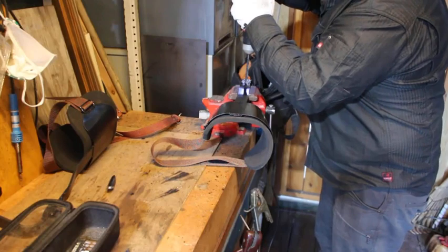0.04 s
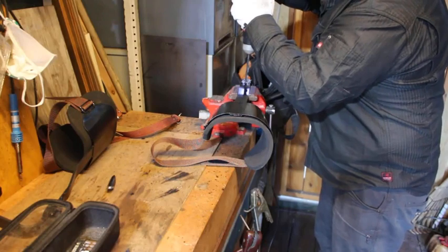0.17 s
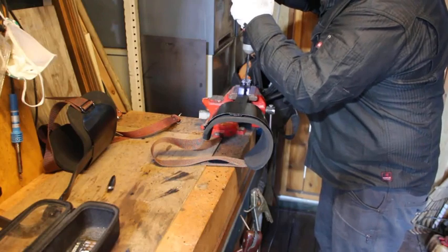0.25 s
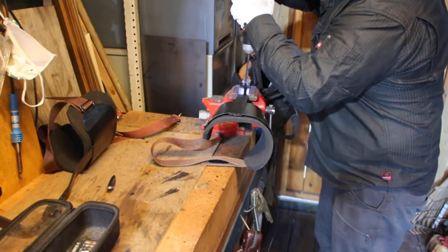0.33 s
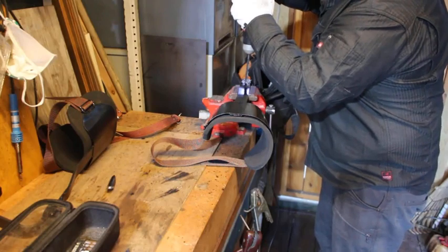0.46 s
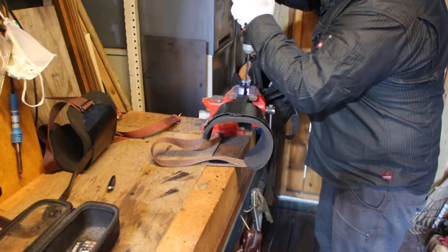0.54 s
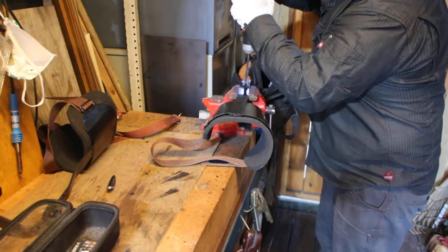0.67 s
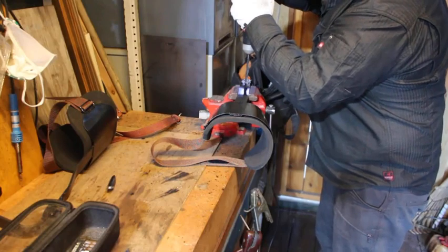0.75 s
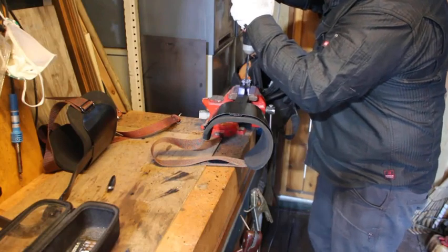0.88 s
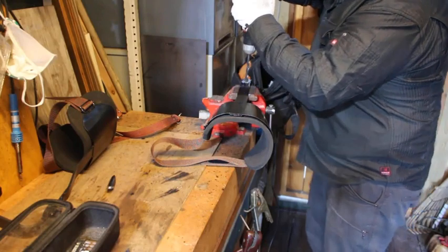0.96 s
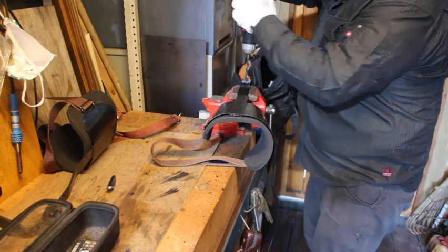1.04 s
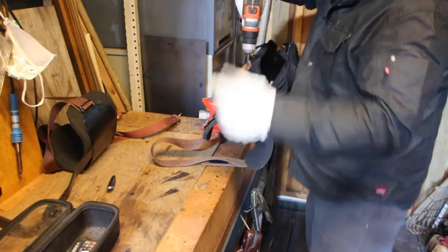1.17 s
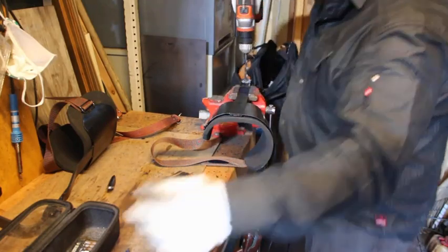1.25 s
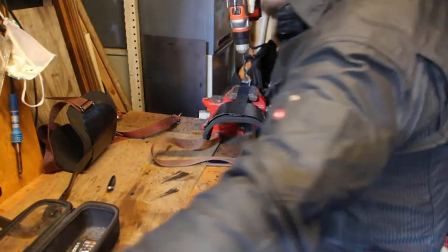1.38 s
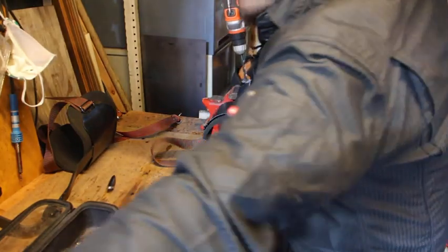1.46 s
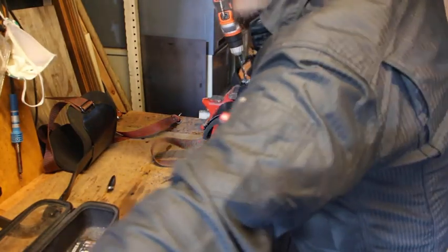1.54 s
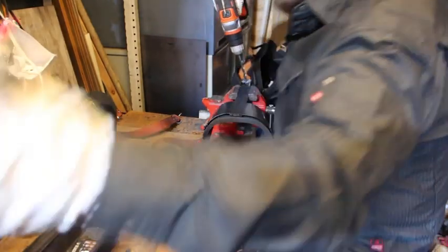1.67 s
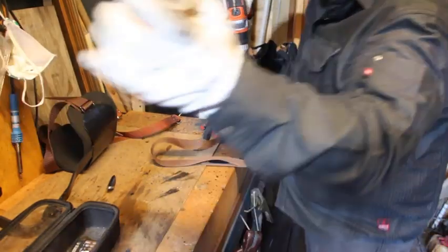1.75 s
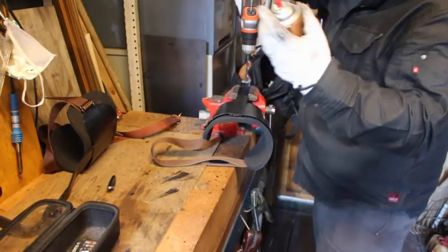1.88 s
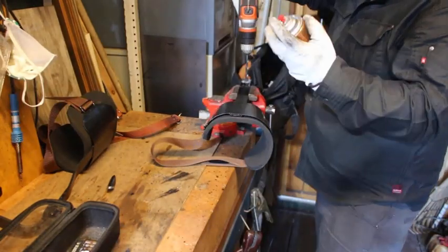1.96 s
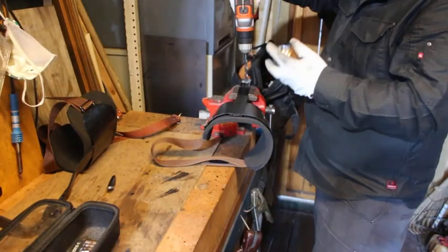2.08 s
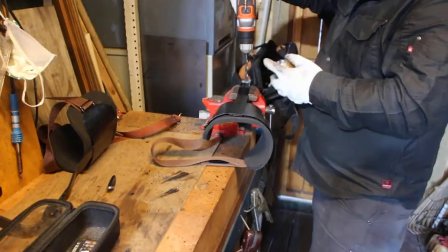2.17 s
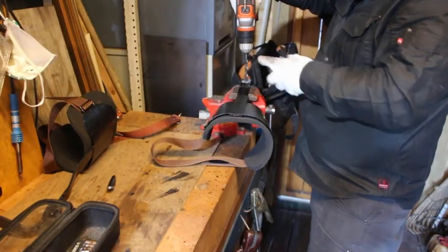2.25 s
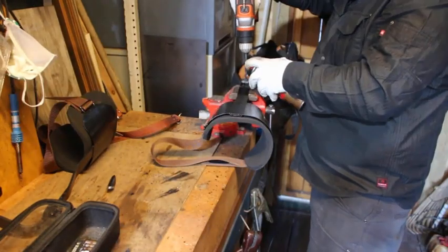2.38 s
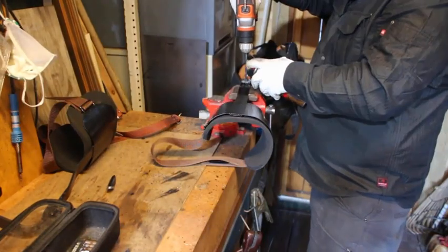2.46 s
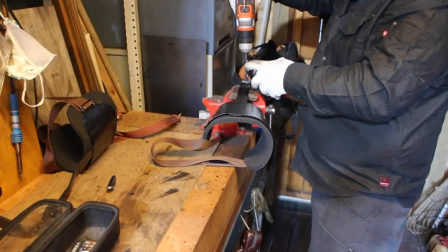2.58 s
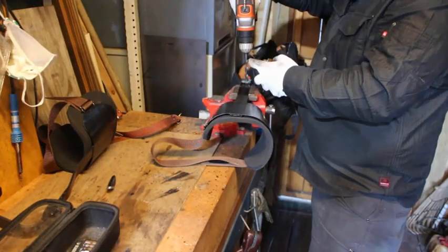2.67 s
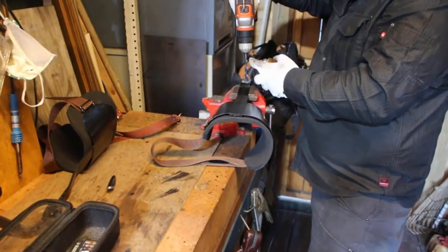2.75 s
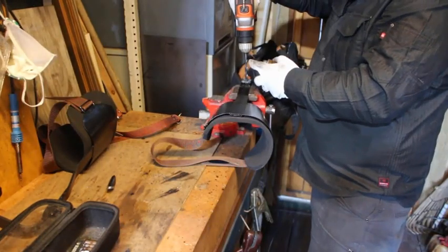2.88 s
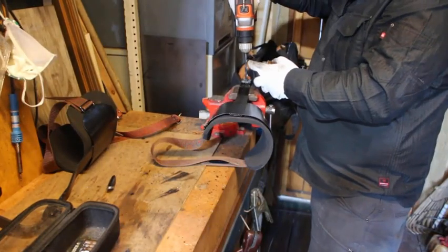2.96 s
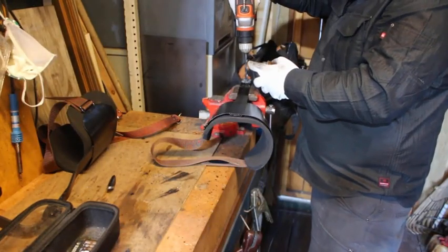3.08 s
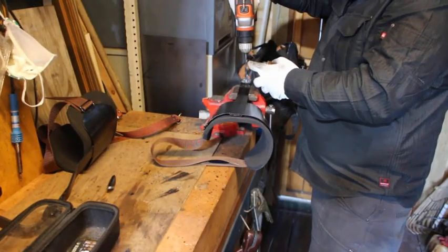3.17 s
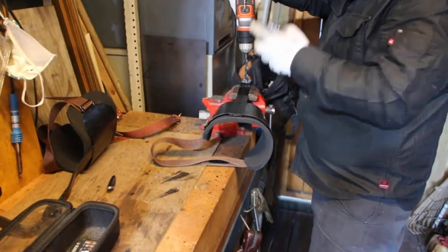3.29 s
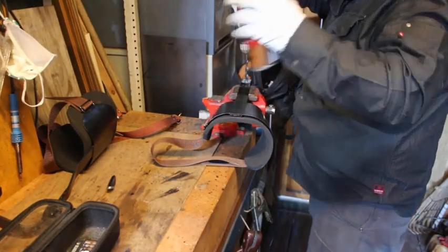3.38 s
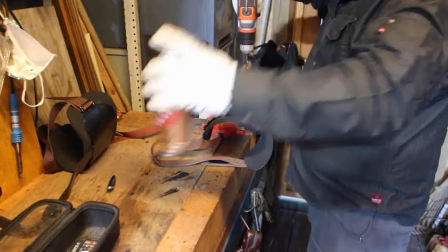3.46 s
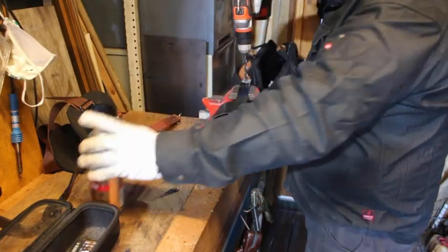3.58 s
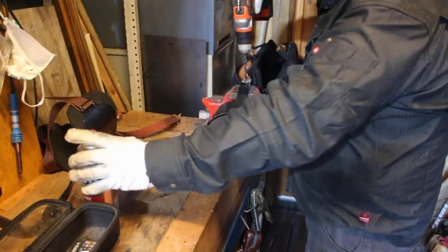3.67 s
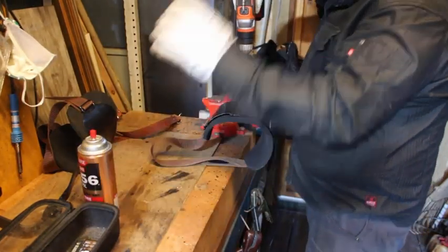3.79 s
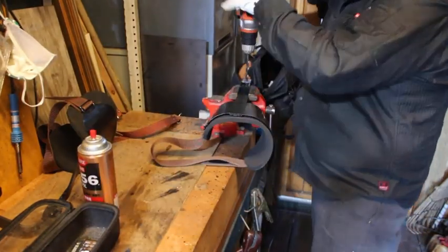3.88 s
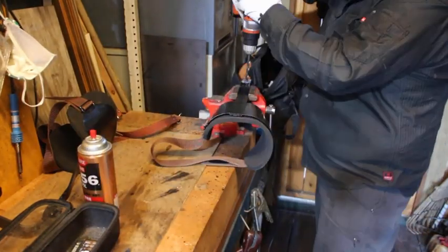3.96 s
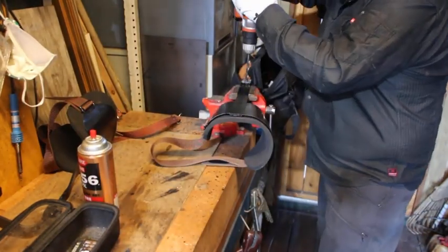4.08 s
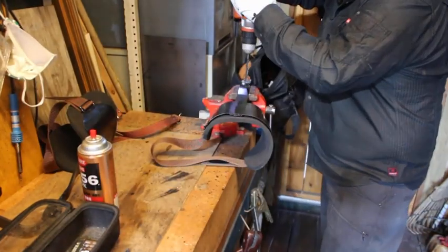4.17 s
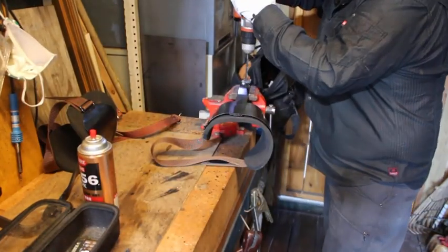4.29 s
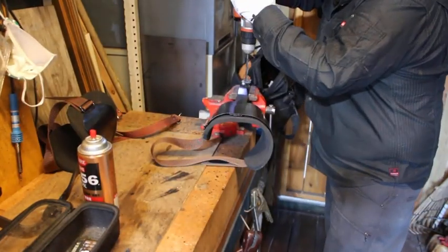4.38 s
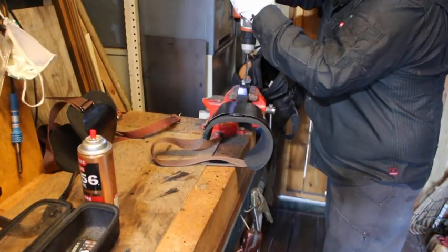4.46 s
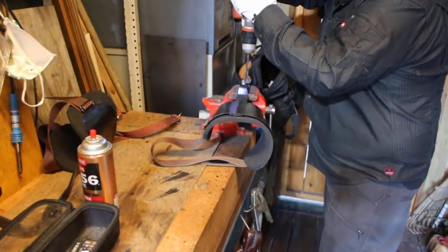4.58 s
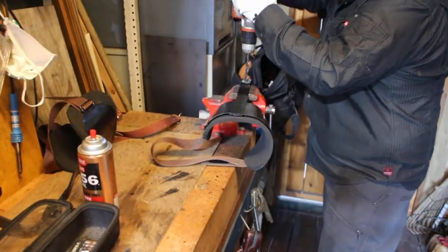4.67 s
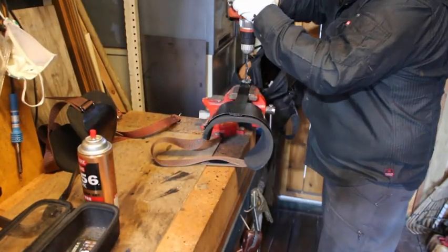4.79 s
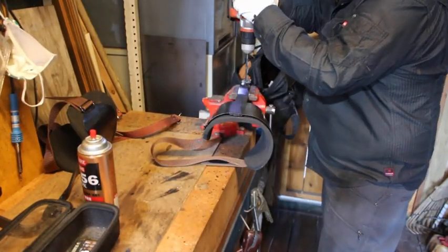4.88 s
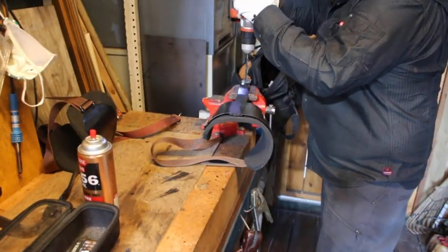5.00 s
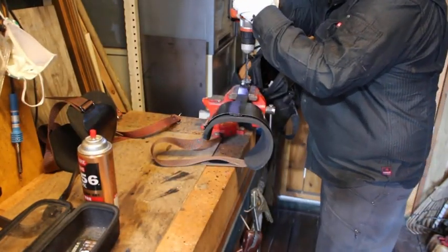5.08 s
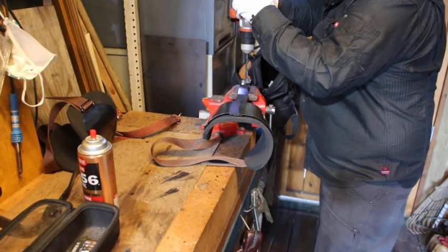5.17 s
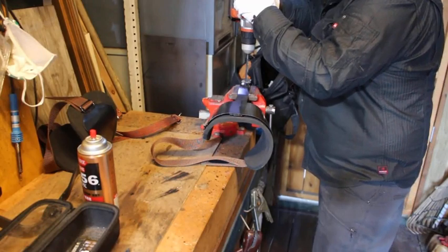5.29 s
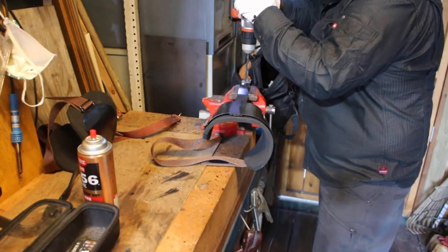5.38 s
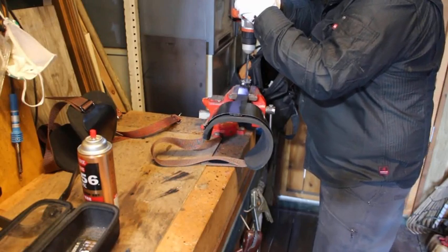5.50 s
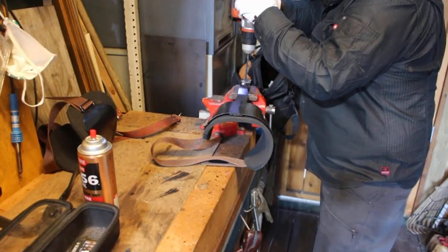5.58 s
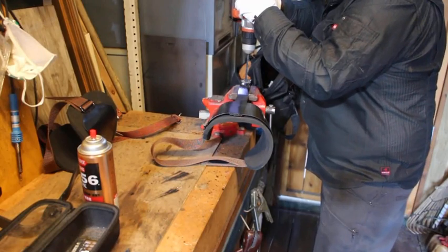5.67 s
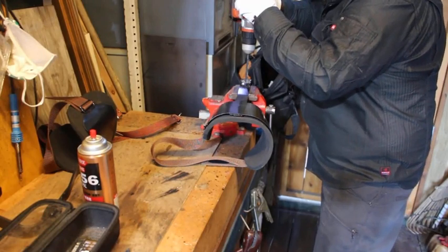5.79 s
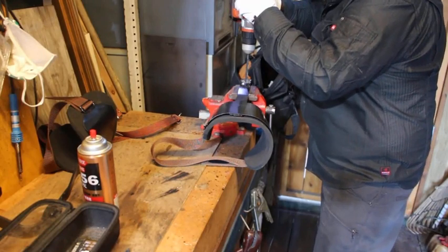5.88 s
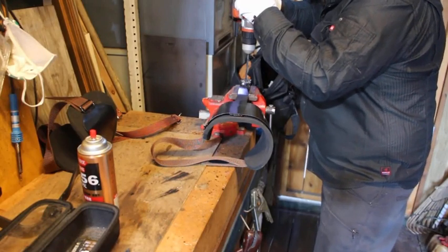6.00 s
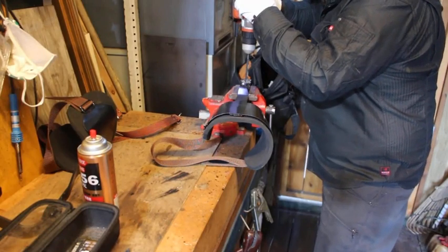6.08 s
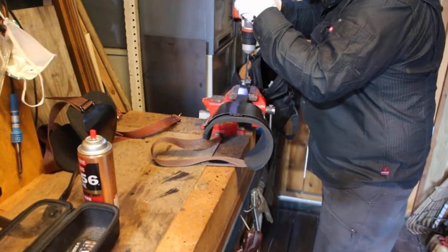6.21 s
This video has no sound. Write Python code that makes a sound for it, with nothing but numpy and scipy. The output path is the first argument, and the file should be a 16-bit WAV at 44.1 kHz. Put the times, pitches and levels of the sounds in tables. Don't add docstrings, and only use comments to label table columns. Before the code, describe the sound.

Close stereo microphones in a small, cluttered wooden workshop with short, dry reflections. From the start a cordless drill bores metal: loud, bright grinding noise with a dense high whine of motor and gears, pulsing about twelve times a second, with small surges as the bit catches. At 0.94 s it brakes abruptly into faint airy room noise. Between 1.0 and 1.35 s a jacket swishes and loose tools knock lightly on the bench; a stronger cloth swish comes at 1.9 s with faint knocks just before. Four short fine hisses of sprayed oil follow at 2.5, 2.75, 3.0 and 3.1 s, growing stronger. At 3.64 s the thin can clacks onto wood, then sleeve rustles until 4.0 s. The drill spins up at 4.17 s for half a second and stops with a tiny squeal at 4.66 s. At 4.85 s it restarts with a chirp and bores on, lower and loaded, to the end.

```python
import sys
import numpy as np
from scipy import signal
from scipy.fft import rfft, irfft
from scipy.io import wavfile

SR = 44100
rng = np.random.default_rng(int(sys.argv[2]) if len(sys.argv) > 2 else 0)


def master(y):
    cut = np.clip(np.atleast_2d(y).T, -1, 1)
    pcm = np.round(cut * 32767)
    wavfile.write(sys.argv[1], SR, pcm.astype(np.int16))


def convert_level_to_amplitude(level_db):
    exponent = np.asarray(level_db, float) / 20
    return 10 ** exponent


N = 275184

# pitch_hz, side_over_mid_db
NEAR_SIDE = [(60, 5), (110, 11), (200, 31), (380, -30), (700, -40), (1290, -30), (2380, -13.5), (4400, -8),
             (8120, -4.5), (15000, -1)]


def rms_one(x):
    return x / np.sqrt(np.mean(x ** 2) + 1e-20)


def in_time(rows):
    s, *columns = np.transpose(rows)
    return [np.interp(np.arange(N) / SR, s, c) for c in columns]


def at_hz(points, hz):
    points_hz, values = np.transpose(points)
    return np.interp(np.log(hz), np.log(points_hz), values)


def drift(rate_hz):
    r = np.exp(-80 * np.pi * rate_hz / SR)
    coarse = rng.standard_normal(N // 40 + 2002)
    slow = signal.lfilter([1], [1, -2 * r, r * r], coarse)[2000:]
    return np.interp(np.arange(N) / 40, np.arange(len(slow)), rms_one(slow))


def ring(push, hz, t60):
    r, w = convert_level_to_amplitude(-60 / (t60 * SR)), 2 * np.pi * hz / SR
    return signal.lfilter([0, np.sin(w)], [1, -2 * r * np.cos(w), r * r], push + 1e-18)


def coloured(mid_side, spectrum, side, peaks=()):
    hz = np.maximum(np.arange(N // 2 + 1) * SR / N, 1)
    gain = convert_level_to_amplitude(at_hz(spectrum, hz))
    for peak_hz, width_hz, db in peaks:
        gain = gain * (1 + (convert_level_to_amplitude(db) - 1) / (1 + (2 * (hz - peak_hz) / width_hz) ** 2))
    widths = [np.ones_like(hz), convert_level_to_amplitude(at_hz(side, hz))]
    mid, rest = irfft(rfft(mid_side) * gain * widths, N)
    return np.array([mid + rest, mid - rest]) / np.std(mid)


def patchy(x, depth_db, rate):
    centres, shared = 200 * 2 ** np.arange(0, 6.6, .5), drift(rate)
    spectrum, hz, out = rfft(x), np.arange(N // 2 + 1) * SR / N, 0
    inside_hz = np.clip(hz, centres[0], centres[-1])
    for centre in centres:
        slope = np.clip(1 - 2 * np.abs(np.log2(inside_hz / centre)), 0, 1)
        flicker_db = depth_db * (0.51 * shared + drift(rate))
        out = out + irfft(spectrum * slope, N) * convert_level_to_amplitude(flicker_db)
    return out


def puffs(rows, spectrum, grain_db, fall_s, fall_per_rise):
    out = np.zeros((2, N))
    grains = rng.standard_normal((2, N)) * convert_level_to_amplitude(grain_db * rng.standard_normal(N))
    noise = coloured(grains, spectrum, NEAR_SIDE)
    for s, rise, hold, db, tilt_db in rows:
        i = round(s * SR)
        n = round((rise + hold + 2 * (fall_s + fall_per_rise * rise)) * SR)
        corners_s = [0, rise / 4, rise, rise + hold, n / SR]
        shape_db = np.interp(np.arange(n) / SR, corners_s, [-38, -8.5, 6.5, 4.5, -37])
        tilt = convert_level_to_amplitude(tilt_db * np.log2(np.arange(1, n // 2 + 2) * SR / n / 4000))
        burst = rms_one(irfft(rfft(noise[:, i:i + n]) * tilt, n))
        out[:, i:i + n] += convert_level_to_amplitude(db + shape_db) * burst
    return out


def struck(hits, modes, crack_db):
    out, t = np.zeros(N), np.arange(9000) / SR
    for s, db, centre_hz, contact_s in hits:
        contact = rng.standard_normal(len(t)) * np.exp(-t / contact_s * 2) * np.minimum(t / 0.00078, 1)
        sound = sum(convert_level_to_amplitude(level_db) * ring(contact, hz, t60) for hz, level_db, t60 in modes)
        sound = rms_one(sound) + convert_level_to_amplitude(crack_db) * rms_one(contact)
        band_hz = [centre_hz / 2.2, centre_hz * 1.7]
        sound = signal.lfilter(*signal.butter(2, band_hz, "band", fs=SR), sound)
        out[round(s * SR):][:len(t)] += convert_level_to_amplitude(db) * sound / np.max(np.abs(sound))
    return out


def shop(x, wet_db):
    n, t60_s = SR // 4, 0.046
    tail = rng.standard_normal((2, n)) * convert_level_to_amplitude(-60 * np.arange(n) / SR / t60_s)
    tail = tail / np.sqrt(np.sum(tail ** 2, axis=1, keepdims=True))
    return x + convert_level_to_amplitude(wet_db) * signal.fftconvolve(np.atleast_2d(x), tail, axes=1)[:, :N]


def air():
    # pitch_hz, level_db per Hz
    air_colour = [(88, -70), (150, -48), (249, -5), (297, -16), (637, -8.5), (730, -7.5), (923, -8),
                  (1210, -6.5), (2360, -6.5), (3160, -6), (16000, -15)]
    # centre_s, spread_s, lift_db over the still air
    reaches = [
        (1.25, .25, 4.5),
        (1.85, .3, 4.2),
        (4.3, .7, 2.5),
    ]
    side = [(150, 4), (400, -6.5), (15000, -1.0)]   # pitch_hz, side_over_mid_db
    noise = coloured(rng.standard_normal((2, N)), air_colour, side)
    t = np.arange(N) / SR
    rub_db = sum(db * np.exp(-.5 * ((t - s) / spread) ** 2) for s, spread, db in reaches)
    return convert_level_to_amplitude(-54 + rub_db + .8 * drift(9)) * noise


def sleeve():
    # start_s, rise_s, hold_s, level_db, tilt_db per octave
    swishes = [(1.05, 0.023, .03, -52.5, .1), (1.33, 0.042, 0.037, -48, -0.7),
               (1.87, 0.051, 0.015, -36.5, -0.1), (2.14, 0.019, 0.022, -57, -1.1),
               (2.26, 0.037, 0.047, -58, .1), (2.92, .008, .005, -62, -3), (3.694, .002, .004, -49, 4),
               (3.86, 0.045, .03, -55, .1), (3.975, 0.032, 0.008, -42.5, -2.4)]
    # pitch_hz, level_db per Hz
    cloth = [(180, -71), (300, -45), (584, -18), (1100, -19), (1530, -2.5), (2170, -5.5), (2360, -2),
             (3520, -3), (5900, -3), (16000, -12.5)]
    return puffs(swishes, cloth, grain_db=6.0, fall_s=.005, fall_per_rise=.75)


def bench_knocks():
    # start_s, peak_db, centre_hz, contact_s
    knocks = [(1.008, -50, 330, .01), (1.131, -30, 2600, .022), (1.144, -33, 680, .026),
              (1.221, -41, 520, .035), (1.222, -37, 1900, .04), (1.258, -35, 1300, .022),
              (1.295, -50, 800, .012), (1.771, -50, 620, .016), (1.832, -47, 3000, .012),
              (1.835, -49, 340, .012)]
    # pitch_hz, level_db, t60_s
    bench = [(332, -24, 0.068), (508, -16, 0.12), (700, -7, 0.05), (913, -2, 0.12), (1280, 4, 0.026),
             (1496, -2, 0.07), (2100, -2, .03), (2390, 10, 0.028), (3180, 6, 0.066), (4300, -9, .04)]
    return struck(knocks, bench, crack_db=10.5)


def can_set_down():
    # start_s, peak_db, centre_hz, contact_s
    contacts = [
        (3.6422, -24, 1500, 0.0096),
        (3.6432, -20, 4000, 0.018),
        (3.645, -34.5, 400, .018),
        (3.664, -40, 800, 0.014),
    ]
    # pitch_hz, level_db, t60_s
    can_modes = [(400, -21, .06), (608, -15, 0.12), (940, -28, .04), (1340, 1, 0.04), (1800, -1, 0.024),
                 (2350, -1, 0.04), (3020, -3, 0.044), (3500, -1, 0.022), (4850, -7, .02),
                 (5970, -15, 0.036), (7500, -11, .04)]
    return struck(contacts, can_modes, crack_db=9.5)


def spray_can():
    # start_s, rise_s, hold_s, level_db, tilt_db per octave
    squirts = [
        (2.531, 0.0033, .02, -48.5, 1.1),
        (2.761, 0.011, 0.034, -44.5, 1.3),
        (3.018, .03, 0.016, -43.5, 2.7),
        (3.127, 0.011, 0.034, -40, 3),
    ]
    # pitch_hz, level_db per Hz
    spray = [(180, -56), (300, -17), (1210, -10), (2000, -13), (2930, -8), (3190, -8), (8360, -5),
             (13500, -7), (16000, -9)]
    return puffs(squirts, spray, grain_db=1.05, fall_s=.025, fall_per_rise=.15)


def squeals():
    # start_s, level_db, pitch_hz, t60_s
    rubs = [(4.195, -17, 2550, .08), (4.218, -22, 2200, .06), (4.2, -26, 6500, .06),
            (4.653, -14, 2550, .04), (4.658, -14, 2200, .04), (4.858, -22, 2950, .06),
            (4.88, -24, 2300, .05), (4.893, -16, 2600, .08), (4.9, -18, 1750, .1), (4.915, -22, 6800, .05),
            (1.131, -35, 1491, .09), (1.151, -34, 931, .09), (1.146, -38, 500, .07),
            (1.261, -42, 1250, .04), (1.77, -45, 640, .05), (4.025, -52, 620, .05)]
    out, rub_length = np.zeros(N), 300
    for s, db, hz, t60 in rubs:
        rub, i = np.zeros(8000), round(s * SR)
        wave = np.sin(2 * np.pi * hz * np.arange(rub_length) / SR)
        rub[:rub_length] = np.hanning(rub_length) * wave / 75
        out[i:i + len(rub)] += convert_level_to_amplitude(db) * ring(rub, hz, t60)
    return out


def trigger():
    # pull_s, bit_seated_s, release_s, level_db, first_jolt_db below it
    pulls = [
        (-1, -.5, .942, -17.5, -9),
        (4.165, 4.37, 4.66, -18.3, -12),
        (4.852, 5.17, 7, -18, -7),
    ]
    # time_s, speed in turns per s
    running_speed = [(0, 463), (.15, 462), (.94, 462), (4.25, 461), (4.36, 467), (4.42, 470), (4.645, 470),
                     (4.93, 460), (5.0, 465.5), (5.1, 464.5), (5.22, 460), (5.57, 460), (5.75, 456.5),
                     (6.0, 457), (6.24, 458.5)]
    # time_s, jump_db
    catches = [
        (.166, 2.8),
        (.262, 2.8),
        (.748, 2.8),
        (.83, 1.5),
        (4.895, 2.5),
    ]
    # idle_db, full_load_db over idle, unseated_db, dry_bit_db
    motor_law = (-12, 2.5, -8.5, -2.5)
    brush_law = (-17, 8.5, -2.5, -1)
    gear_law = (-11.5, -4.5, .3, -.3)
    mesh_law = (-19.5, 8.5, -1.5, 5.5)
    shake_law = (-2.2, -13, 5, -4)
    spin_up_s, spin_up_lag = .08, 160
    brake_lead_s, brake_per_s2 = .01, 2600
    kick_s, swell_s, run_up_s = .004, .018, .045
    swell_share = .25
    slack_s, catch_rise_s, catch_fall_s, slack_db = .035, .012, .04, -1.5
    seating_s, oiled_s = .08, 2.5

    t, (running,) = np.arange(N) / SR, in_time(running_speed)
    load = (470 - running) / 13
    which = np.searchsorted([row[0] - .05 for row in pulls[1:]], t)
    pull, seated, release, db, jolt_db = np.array(pulls)[which].T
    since, after = t - pull, np.maximum(t - release, 0)

    speed = running - spin_up_lag * np.clip(1 - since / spin_up_s, 0, 1)
    speed = np.maximum(speed - brake_per_s2 * np.maximum(t - release + brake_lead_s, 0), 300)

    start_s = [0, kick_s, kick_s + swell_s, kick_s + run_up_s]
    start_db = np.interp(since, start_s, [1, 1, swell_share, 0]) * jolt_db
    start_db -= 60 * np.clip(1 - since / kick_s, 0, 1)
    catch_s = [-slack_s - catch_rise_s, -catch_rise_s, 0, catch_fall_s]
    catch_db = sum(np.interp(t - s, catch_s, [0, slack_db, jump_db, 0]) for s, jump_db in catches)
    brake_db = np.minimum(780 * after, 450 * after + 14)
    level_db = db + 2.4 * load + start_db + catch_db - brake_db

    loose, dry_bit = np.clip((seated - t) / seating_s + .5, 0, 1), t < oiled_s
    laws = [idle + loaded * load + unseated * loose + unoiled * dry_bit
            for idle, loaded, unseated, unoiled in (motor_law, brush_law, gear_law, mesh_law, shake_law)]
    return level_db, speed, laws


def lines(orders, level_db, turn, blur, flicker_db):
    out = np.zeros((2, N))
    for multiple, db in orders:
        angle = multiple * turn + blur * np.sqrt(multiple) * drift(33)
        out[0] += convert_level_to_amplitude(db + flicker_db * drift(23)) * np.sin(angle)
        out[1] += convert_level_to_amplitude(db + flicker_db * drift(11)) * np.cos(angle + drift(35))
    return convert_level_to_amplitude(level_db) * out


def drill():
    # multiple of the rotor speed, level_db
    motor = [(3, -24), (4, 1)]
    # multiple, level_db
    brushes = [(1, -34), (2, -15), (5, -.5), (6, -2)]
    # multiple, level_db
    gears = [(7, -27), (8, 0), (9, -5.5), (10, 1), (11, -21), (12, -2.5), (13, -1), (14, -1), (16, -8.5),
             (18, -2.5), (19, -4.5), (20, 1), (21, -21), (22, -10)]
    # multiple, level_db
    mesh = [(15, -3), (29, -7), (30, 0), (31, -10), (33, -19)]
    # pitch_hz, level_db per Hz
    grind_colour = [(100, -87), (200, -63), (330, -30.5), (800, -25.5), (1200, -14), (1800, -4.5),
                    (2300, -4), (4000, -0.5), (7000, -5), (9500, -7), (11400, -8), (13700, -6.5),
                    (16000, -15.5)]
    # pitch_hz, width_hz, level_db
    housing = [(400, 50, 9.5), (560, 37, -20), (810, 56, 0.5), (1030, 35, -7), (1142, 140, 7.5),
               (1452, 256, -5), (1630, 95, 1.5), (1940, 140, -4), (2110, 55, -12), (2250, 78, 6),
               (2560, 130, 0), (3030, 240, 2.5), (3360, 110, -6), (4164, 93, 7), (4350, 150, -11.5),
               (5280, 160, -4), (5520, 260, 0.5), (7020, 120, 7), (8100, 170, 6), (9000, 200, 6.5)]
    gearing, full_speed = 37.5, 455

    grind_db, speed, (motor_db, brush_db, gear_db, mesh_db, shake_db) = trigger()
    chuck_angle = 2 * np.pi * np.cumsum(speed) / SR / gearing
    bite = np.cos(chuck_angle + 4.74 + 0.2 * drift(5.73)) * convert_level_to_amplitude(1.5 * drift(3.47))
    turn = 2 * np.pi * np.cumsum(speed * (1 - .0025 * bite + .0006 * drift(40))) / SR

    whine = lines(motor, motor_db, turn, blur=.06, flicker_db=1.4)
    whine += lines(brushes, brush_db, turn, blur=.07, flicker_db=1.8)
    whine += lines(gears, gear_db, turn, blur=.12, flicker_db=2.5)
    whine += lines(mesh, mesh_db + 4.0 * bite, turn, blur=.17, flicker_db=2.8)
    whine *= convert_level_to_amplitude(.25 * np.minimum(speed - full_speed, 0))

    pulsing = 1 + 0.085 * np.sin(turn) + 0.071 * np.sin(turn / 2) + 0.06 * np.sin(2 * turn)
    teeth = rng.standard_normal((2, N)) * pulsing
    teeth = shop(teeth, wet_db=-4)
    grind = patchy(coloured(teeth, grind_colour, NEAR_SIDE, housing), depth_db=.8, rate=25)
    grind += convert_level_to_amplitude(shake_db) * signal.lfilter(*signal.butter(2, 1800, fs=SR), grind)

    whine = np.std(whine[0]) * coloured(whine, [(100, 0.016), (16000, 0.0058)], NEAR_SIDE)
    return convert_level_to_amplitude(grind_db - 0.5 + 0.28 * bite) * (grind + whine)


def scene():
    knocks = bench_knocks() + can_set_down()
    hiss = spray_can() + sleeve()
    return drill() + squeals() + shop(knocks, wet_db=-9.5) + hiss + air()


def low_pass(x):
    return signal.sosfilt(signal.butter(12, 16620, fs=SR, output="sos"), x)


def record(dry):
    # pitch_hz, level_db rms
    hum_tones = [(43.1, -82.5), (258.4, -84)]
    rounded = .85 * np.tanh(dry / .85)
    x = signal.sosfilt(signal.butter(5, 295, "high", fs=SR, output="sos"), rounded)
    x = signal.sosfilt(signal.ellip(10, .5, 55, 15720, fs=SR, output="sos"), x)
    t = np.arange(N) / SR
    hum = sum(np.sqrt(2) * convert_level_to_amplitude(db) * np.sin(2 * np.pi * hz * t) for hz, db in hum_tones)
    offset = -0.00048
    return low_pass(x + hum + offset)


dry = scene()
out = record(dry)
master(out)
```